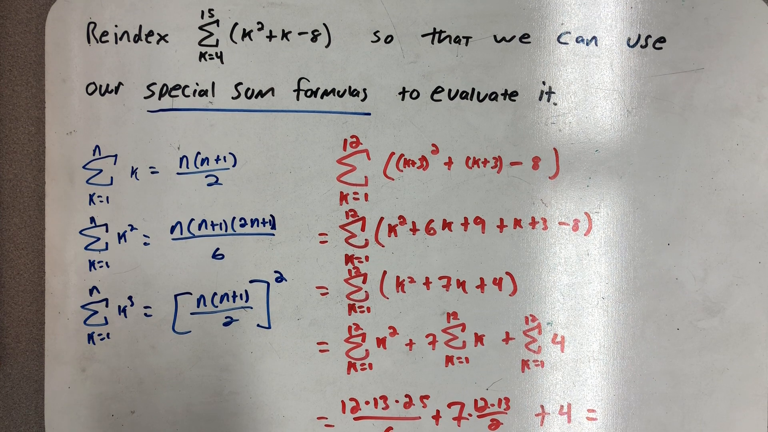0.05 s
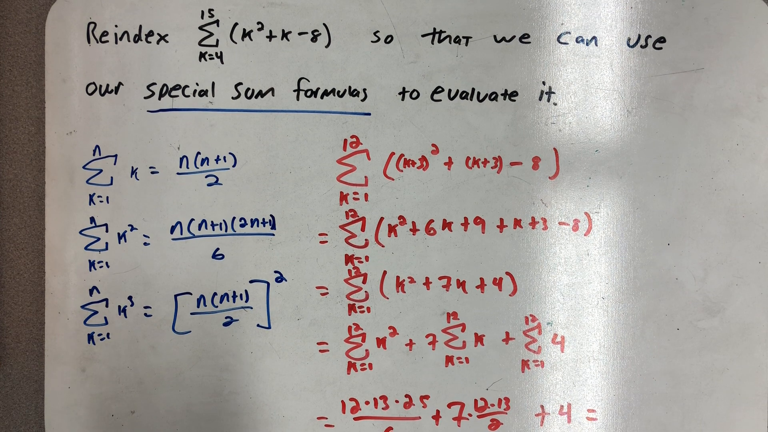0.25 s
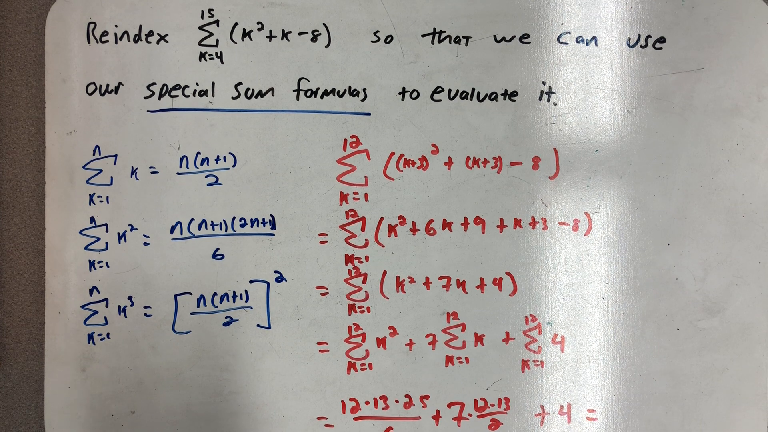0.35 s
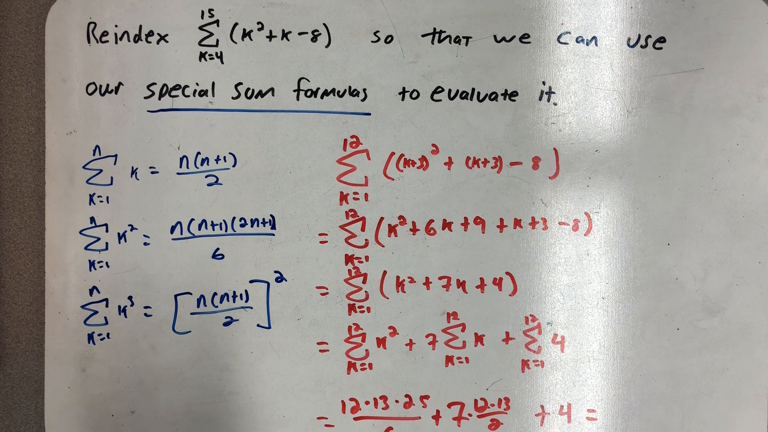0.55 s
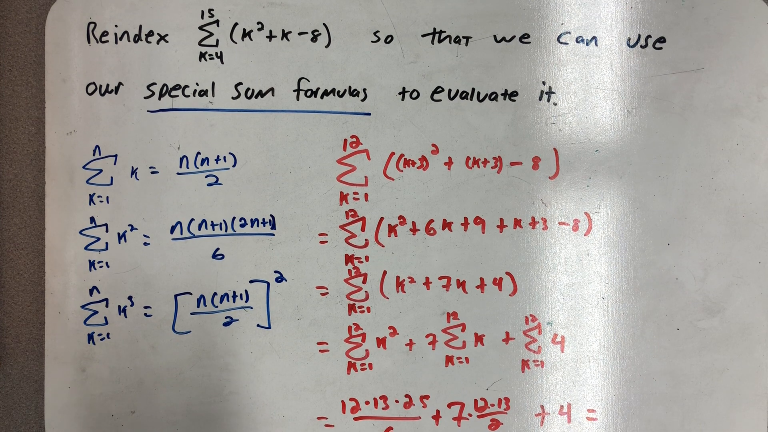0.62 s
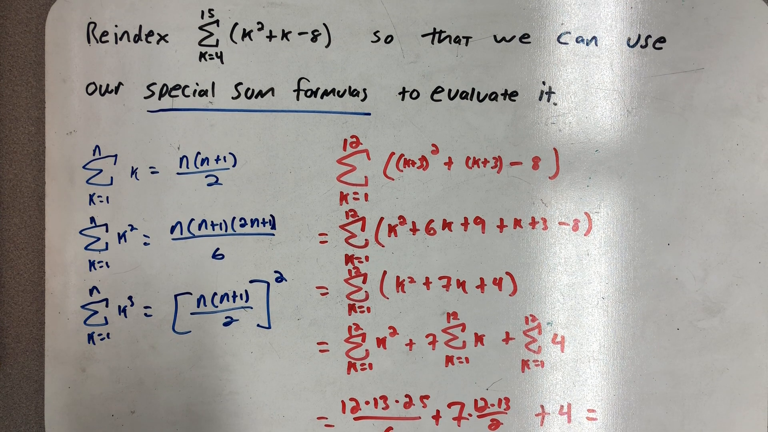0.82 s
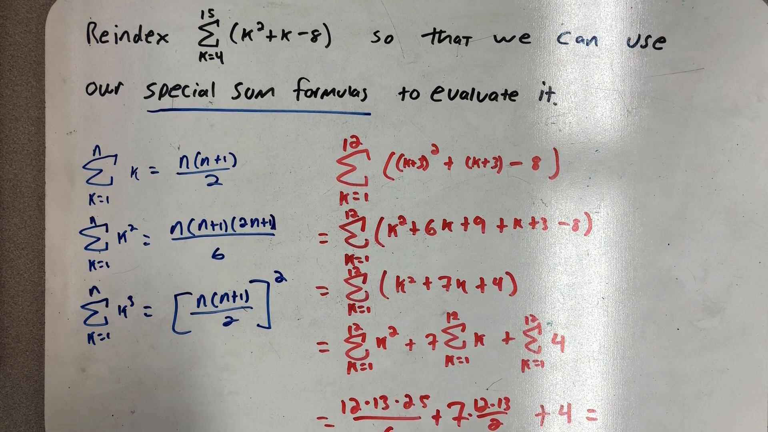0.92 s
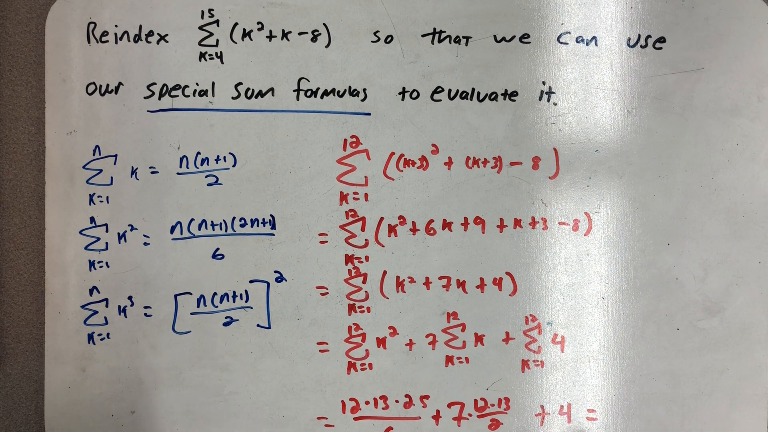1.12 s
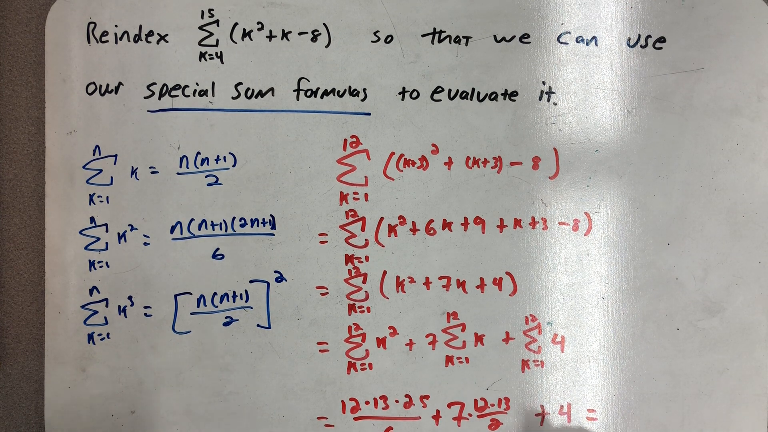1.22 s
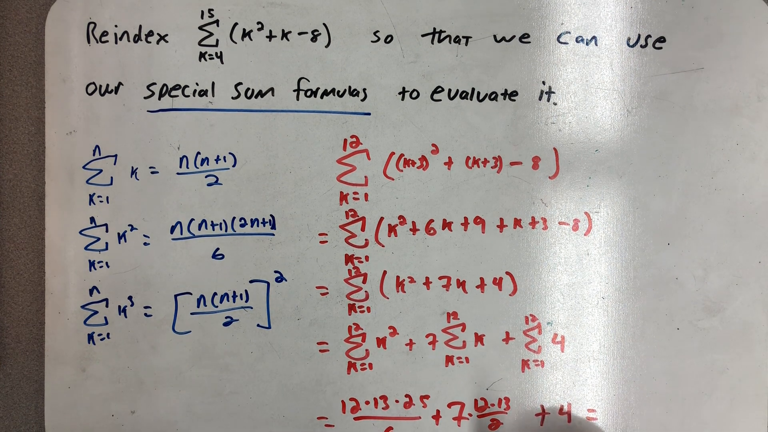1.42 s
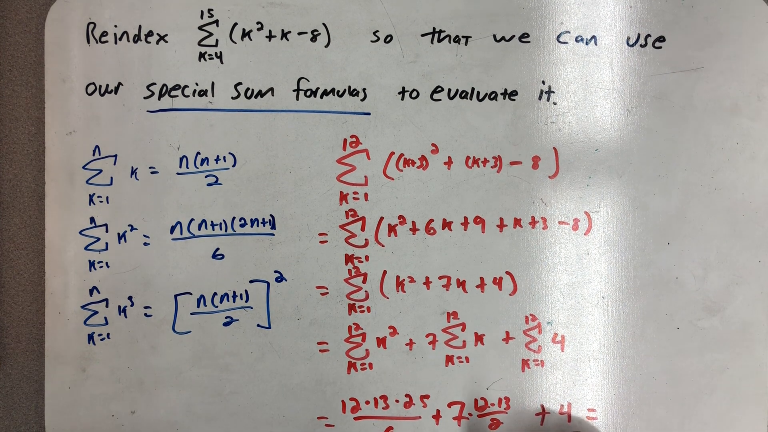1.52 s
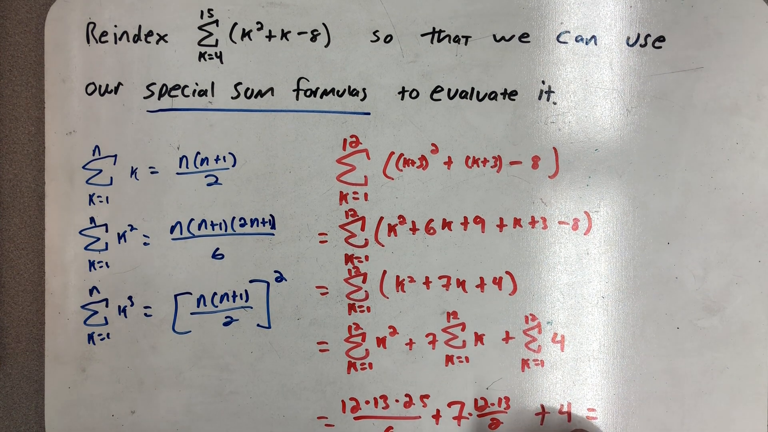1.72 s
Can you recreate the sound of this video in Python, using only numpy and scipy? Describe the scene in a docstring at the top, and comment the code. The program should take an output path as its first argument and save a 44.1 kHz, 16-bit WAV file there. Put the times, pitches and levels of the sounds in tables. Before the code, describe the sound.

A calculator key snaps crisply once, followed by light hand rustle and a quick dull key patter

```python
"""A handheld calculator is worked at a desk in a quiet room: random-phase lines and noise form a steady ventilation hum.
Faint ticks, noise bursts with a ringing mode, come first; then one key snaps sharply, a dispersed pulse
that rings the plastic case, and another tick follows. A hand brushes over paper, as swells of grainy hiss,
with one more tick among them; a few soft, dull key taps, decaying noise and modes, end the scene.
Snap, ticks and taps each excite early reflections and a diffuse room tail."""
import sys
import numpy as np
from scipy import signal
from scipy.fft import rfft, irfft
from scipy.io import wavfile
from scipy.ndimage import uniform_filter1d

SR = 44100
rng = np.random.default_rng(int(sys.argv[2]) if len(sys.argv) > 2 else 0)


def file_out(sig):
    """Save sig as 16-bit WAV at sys.argv[1]."""
    # one column per channel
    cols = np.atleast_2d(sig).T
    # limit, then scale
    lim = np.clip(cols, -1, 1)
    pcm = np.round(lim * 32767).astype(np.int16)
    wavfile.write(sys.argv[1], SR, pcm)


N = 77175
T = np.arange(N) / SR  # time axis [s]

# spectrum of room air and ventilation rumble: (frequency [Hz], relative level [dB])
AIR_SPECTRUM = [(12, -39), (20, -5.5), (49, -10), (76, -6.5), (119, 0), (185, -8.5), (213, -14.5),
                (252, -13.5), (289, -22), (352, -23), (382, -27), (505, -22), (906, -23.5), (985, -27.5),
                (1670, -38), (3170, -47), (4950, -47), (6720, -54.5), (15500, -60)]
# hum and fan tones: (frequency [Hz], level [dB], full width at half amplitude [Hz])
HUM_TONES = [(49.14, -51.5, 6), (116.1, -56.5, 4.7), (205.7, -60.5, 3), (353.5, -71.5, 2.1),
             (523.3, -77, 15), (570.2, -70.5, 4.4), (749, -70, 1.3), (794.4, -75, 2.4), (989, -74, 1.7)]
AIR_DB = -46.5

# reverberation time of the room: (frequency [Hz], t60 [s])
ROOM_DECAY = [(300, 6.5), (2000, 0.54), (4500, 0.47), (8000, 0.51), (15000, 0.6)]
# colour of the room tail: (frequency [Hz], relative level [dB])
TAIL_SPECTRUM = [(300, -2), (2000, 1.5), (4200, 5.5), (8000, -4.5), (11000, -3.5), (15000, -6)]
REFLECTIONS_PER_S, REFLECTION_T60_S, ROOM_RISE_S = 2000, 0.11, 0.017
SNAP_TO_ROOM_DB, TICK_TO_ROOM_DB, TAP_TO_TAIL_DB = -16, -17.5, -6
SHARP_TO_DESK_DB, TAP_TO_DESK_DB = 4, -21  # snaps and ticks enter the desk after their room gain

# hand brushing over paper: (time of peak [s], half width at 1/e of the power [s], level [dB])
BRUSH_STROKES = [(0.878, 0.0092, -63.5), (0.972, 0.034, -69), (1.338, 0.01, -66.5), (1.375, 0.092, -70),
                 (1.42, 0.03, -60.5)]
# spectrum of the brushing: (frequency [Hz], relative level [dB])
BRUSH_SPECTRUM = [(1000, -12), (3000, -1.5), (5500, -2), (7300, 0), (9000, -4.5), (12000, 0), (15300, 2),
                  (16000, 4)]
BRUSH_GRAIN, GRAIN_SAMPLES = 0.22, 40  # depth as rms of log amplitude; smoothing length

# faint ticks of loose keys: (time [s], level [dB], ring frequency [Hz], relative ring level [dB])
KEY_TICKS = [(0.524, -54.5, 3670, -3), (0.5772, -50, 2900, -32), (0.7133, -46, 1497, -2.5),
             (1.2768, -68.5, 4490, 12)]
# spectrum of a tick: (frequency [Hz], relative level [dB])
TICK_SPECTRUM = [(300, -16), (1200, 9), (3500, 4), (7000, -8.5), (16000, -12)]
TICK_T60_S, TICK_RING_T60_S = 0.017, 0.014

# soft key taps: (time [s], level [dB], treble tilt [dB per octave], relative key ring level [dB],
# relative after-ring level [dB], edge tick frequency [Hz], relative edge tick level [dB])
KEY_TAPS = [(1.4828, -48, 1.5, 3, -25, 9500, -13), (1.4944, -49, 2, 14, -22, 5830, -11),
            (1.504, -55.5, 5, -4, -14, 4240, -4), (1.5161, -45, 3.5, -16, -7, 5840, -19),
            (1.5256, -59.5, 5, -4, 4, 6640, -6)]
# spectrum of the knock before tilt: (frequency [Hz], relative level [dB])
TAP_SPECTRUM = [(300, 6.5), (1200, 9), (2100, 11), (2800, -7.5), (4500, -8), (6200, -8), (8000, -28),
                (10000, -27), (16000, -26)]
# modes of a tapped key: (frequency [Hz], relative level [dB], t60 [s])
KEY_MODES = [(3370, -16.5, 0.048), (3820, -6, 0.021), (3970, -8, 0.017)]
TAP_T60_S, TAP_RISE_S = 0.03, 0.0007
EDGE_OCTAVES, EDGE_T60_S = 0.13, 0.023
LINGER_HZ, LINGER_OCTAVES, LINGER_T60_S, LINGER_RISE_S = 1850, 0.078, 0.18, 0.022
KEY_TO_ROOM_DB = -8  # share of a key's ring that reaches the room

# sharp key clicks, first contact and then the snap: (time [s], level [dB])
SNAP_CLICKS = [(0.684, -27), (0.6873, -13)]
# modes of the plastic case: (frequency [Hz], relative level [dB], t60 [s])
CASE_MODES = [(832, -25.5, 0.03), (1037, -25.5, 0.024), (1317, -30, 0.032), (1995, -22.5, 0.02),
              (2225, -35.5, .02), (3144, -13, 0.012), (3470, -16, 0.014), (4130, -5.5, 0.0088),
              (4500, -16.5, 0.022), (5230, -15.5, 0.02), (5973, -19.5, 0.014), (6100, -13.5, 0.013),
              (7430, -4, 0.011), (9300, -5, 0.0087), (11600, -13, .016), (12900, -20, 0.022),
              (14520, -12, 0.02), (15520, -11, 0.02)]
# spectrum of the broadband crack: (frequency [Hz], relative level [dB])
CRACK_SPECTRUM = [(300, -44.5), (550, -21), (800, -7), (2400, -11), (3100, -3.5), (4300, 3.5), (5800, -1.5),
                  (7500, 2), (9300, -2.5), (10500, -3.5), (13000, -7), (16000, -5.5)]
# share of the case's ring that reaches the room: (frequency [Hz], gain [dB])
CASE_TO_ROOM = [(1000, -4.5), (4200, -5), (5500, -4), (8000, -11.5), (15000, -21.5)]
CRACK_DB, SCATTER_DB, SCATTER_T60_S, SNAP_RISE_S = 10.5, -10.5, 0.019, 0.00014
BEND_DELAY_S = 0.001108  # travel time of a bending wave at 1 kHz

LOW_CUT_HZ, HIGH_CUT_HZ = 49, 16100


def amp(db):
    """Level definition: an amplitude ratio is ten to the power dB / 20."""
    return 10 ** (np.asarray(db) / 20)


def unit(x):
    """Normalization: divides by the root mean square, giving rms 1."""
    return x / np.sqrt(np.mean(x ** 2) + 1e-20)


def read(points, hz):
    """Interpolation of a table on a logarithmic frequency axis."""
    f, value = np.transpose(points)
    return np.interp(np.log(hz + 1), np.log(f + 1), value)


def add(mix, s, sound):
    """Superposition: adds a sound into the mix from time s."""
    part = mix[round(s * SR):][:len(sound)]
    part += sound[:len(part)]


def colour(x, points, tilt_db=0):
    """Linear filtering: weights the spectrum by a table and a tilt per octave about 2 kHz."""
    hz = np.fft.rfftfreq(len(x), 1 / SR)
    octaves = np.log2(np.maximum(hz, 500) / 2000)  # the tilt is level below 500 Hz
    gain = amp(read(points, hz) + tilt_db * octaves)
    return irfft(rfft(x) * gain, len(x))


def noise(points, tilt_db=0):
    """Filtered white noise: random signs take on a given spectrum, at rms 1."""
    white = rng.choice([-1., 1.], N)
    return unit(colour(white, points, tilt_db))


def band(hz, octaves):
    """Band-pass noise: a Gaussian response in octaves (standard deviation), at rms 1."""
    f = np.fft.rfftfreq(N, 1 / SR) + 1
    response = np.exp(-(np.log2(f / hz) / octaves) ** 2 / 2)
    return unit(irfft(rfft(rng.standard_normal(N)) * response, N))


def fade(t60):
    """Exponential damping: amplitude falls by 60 dB in t60 seconds."""
    return np.exp(-np.log(1000) * T / t60)


def rise(seconds):
    """Finite onset: amplitude grows linearly to 1."""
    return np.minimum(T / seconds, 1)


def ring(modes):
    """Modal superposition: a struck part sounds as damped sinusoids of random phase."""
    out = np.zeros(N)
    for hz, db, t60 in modes:
        out += amp(db) * fade(t60) * np.sin(2 * np.pi * (hz * T + rng.random()))
    return out


def ventilation():
    """Stationary random sound: steady rumble and air, with lines whose finite width makes them waver."""
    out = amp(AIR_DB) * noise(AIR_SPECTRUM)
    f = np.fft.rfftfreq(N, 1 / SR)
    for hz, db, width in HUM_TONES:
        phase = np.exp(2j * np.pi * rng.random(len(f)))
        line = phase / (1 + (2 * (f - hz) / width) ** 2)
        out += amp(db) * unit(irfft(line, N))
    return out


def room(x):
    """Diffuse reverberation: convolution with noise that decays at a rate set by frequency, lows lasting longest."""
    hz, t, z = signal.stft(rng.standard_normal(N), SR, nperseg=256)
    decay = np.exp(-np.log(1000) * t / read(ROOM_DECAY, hz)[:, None])
    z = z * decay * amp(read(TAIL_SPECTRUM, hz))[:, None]
    tail = signal.istft(z, SR)[1][:N] * rise(ROOM_RISE_S) ** 2
    return signal.fftconvolve(x, tail / np.linalg.norm(tail))[:N]


def desk(x):
    """Discrete reflection: sparse early echoes from the desk and nearby things, at random times and strengths."""
    present = rng.random(N) < REFLECTIONS_PER_S / SR
    echoes = rng.standard_normal(N) * present * fade(REFLECTION_T60_S) * rise(ROOM_RISE_S)
    return signal.fftconvolve(x, echoes / np.linalg.norm(echoes))[:N]


def brushes():
    """Sliding friction: skin on paper gives swells of fine, grainy hiss."""
    power = np.zeros(N)
    for s, width, db in BRUSH_STROKES:
        power += amp(db) ** 2 * np.exp(-((T - s) / width) ** 2)
    flutter = unit(uniform_filter1d(rng.standard_normal(N), size=GRAIN_SAMPLES))
    grain = np.exp(BRUSH_GRAIN * flutter)
    return np.sqrt(power) * unit(grain * noise(BRUSH_SPECTRUM))


def ticks():
    """Light impact: keys shifting in their seats give a noise burst and one damped mode."""
    out = np.zeros(N)
    for s, db, hz, ring_db in KEY_TICKS:
        burst = noise(TICK_SPECTRUM) * fade(TICK_T60_S)
        mode = ring([(hz, ring_db, TICK_RING_T60_S)])
        add(out, s, amp(db) * (burst + mode))
    return out


def taps():
    """Cushioned impact: a dull knock, key modes, an edge tick and a hollow after-ring; near sound and room's share."""
    near, to_room = np.zeros((2, N))
    for s, db, tilt_db, key_db, linger_db, edge_hz, edge_db in KEY_TAPS:
        blow = amp(db) * rise(TAP_RISE_S)
        knock = noise(TAP_SPECTRUM, tilt_db) * fade(TAP_T60_S)
        edge = amp(edge_db) * band(edge_hz, EDGE_OCTAVES) * fade(EDGE_T60_S)
        key = amp(key_db) * ring(KEY_MODES) + edge
        linger = rise(LINGER_RISE_S) * band(LINGER_HZ, LINGER_OCTAVES) * fade(LINGER_T60_S)
        add(near, s, blow * (knock + key + amp(linger_db) * linger))
        add(to_room, s, blow * (knock + amp(KEY_TO_ROOM_DB) * key))
    return near, to_room


def crack():
    """Bending-wave dispersion: delay falls as 1 / sqrt(frequency), so a pulse in the case becomes a downward chirp."""
    hz = np.fft.rfftfreq(N, 1 / SR)
    turns = 2 * BEND_DELAY_S * np.sqrt(1000 * hz)  # phase lag in cycles
    pulse = irfft(amp(read(CRACK_SPECTRUM, hz)) * np.exp(-2j * np.pi * turns), N)
    return pulse * (T < T[-1] / 2)  # removes what wraps round to the end


def snaps():
    """Impulsive excitation: a key gives way with a crack, scatter and case modes; near sound and room's share."""
    near, to_room = np.zeros((2, N))
    for s, db in SNAP_CLICKS:
        pulse = amp(CRACK_DB) * crack()
        case = rise(SNAP_RISE_S) * ring(CASE_MODES)
        # the crack bounces around inside the case
        scatter = amp(SCATTER_DB) * noise(CRACK_SPECTRUM) * fade(SCATTER_T60_S) * rise(SNAP_RISE_S)
        add(near, s, amp(db) * (pulse + scatter + case))
        add(to_room, s, amp(db) * (pulse + colour(case, CASE_TO_ROOM)))
    return near, to_room


def scene():
    """Superposition of direct sound, early reflections, diffuse tail and background."""
    tick = ticks()
    tap, tap_to_room = taps()
    snap, snap_to_room = snaps()
    sharp = amp(SNAP_TO_ROOM_DB) * snap_to_room + amp(TICK_TO_ROOM_DB) * tick
    early = desk(amp(SHARP_TO_DESK_DB) * sharp + amp(TAP_TO_DESK_DB) * tap_to_room)
    tail = room(sharp + amp(TAP_TO_TAIL_DB) * tap_to_room)
    direct = snap + tap + tick + brushes()
    return (direct + early + tail + ventilation())[None]


def record(dry):
    """Band limitation: a high-pass reduces the deepest rumble and a low-pass removes the extreme treble."""
    low_cut = signal.butter(2, LOW_CUT_HZ, "high", fs=SR, output="sos")
    high_cut = signal.firwin(511, HIGH_CUT_HZ, window=("kaiser", 9), fs=SR)
    return signal.oaconvolve(signal.sosfilt(low_cut, dry), high_cut[None], "same")


dry = scene()
out = record(dry)
file_out(out)
```